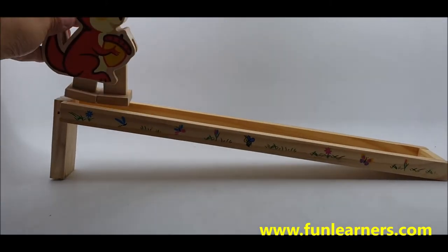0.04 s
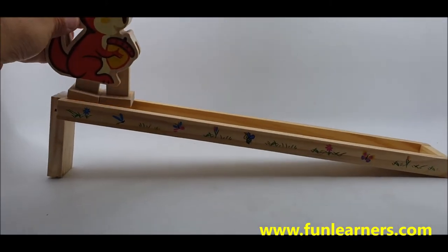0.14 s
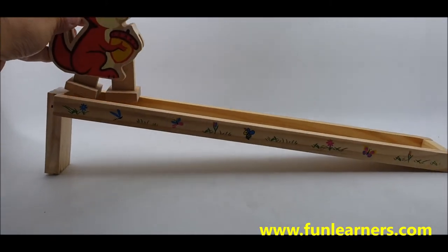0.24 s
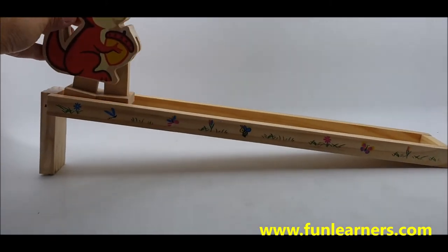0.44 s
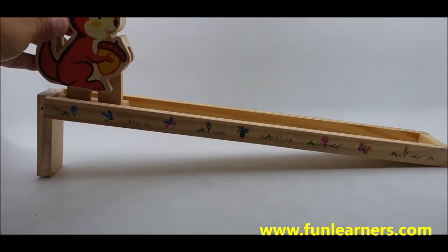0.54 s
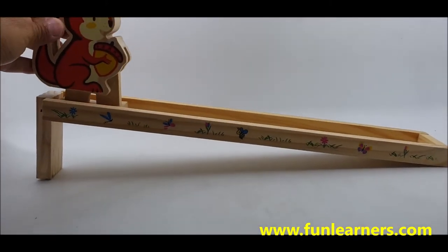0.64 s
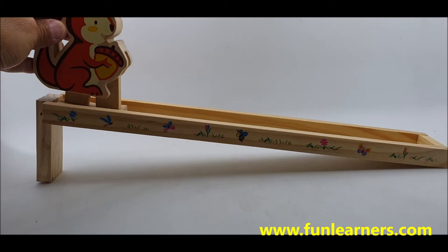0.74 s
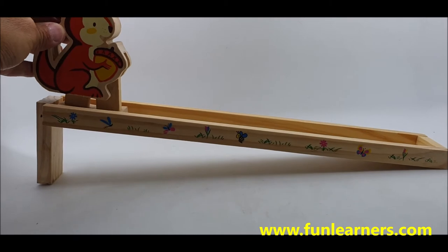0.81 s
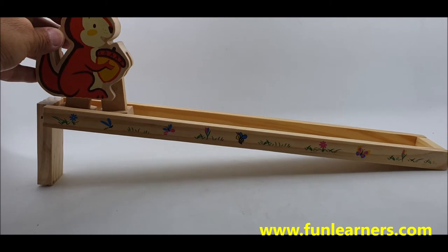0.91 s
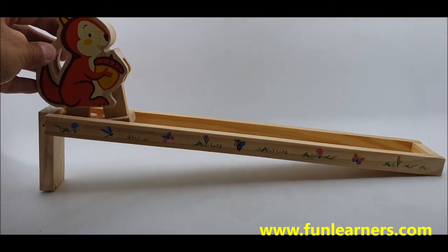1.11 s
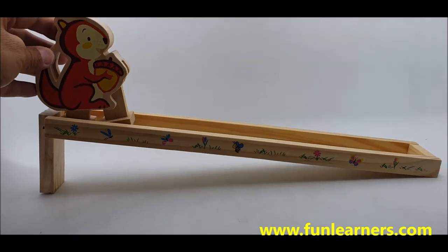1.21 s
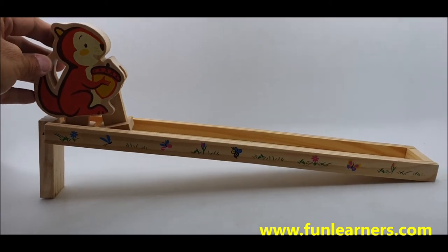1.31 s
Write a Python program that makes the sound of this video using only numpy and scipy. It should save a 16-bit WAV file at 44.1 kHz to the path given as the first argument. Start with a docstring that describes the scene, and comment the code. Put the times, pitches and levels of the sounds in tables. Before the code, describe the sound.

A wooden toy lands on a wooden ramp with a hollow thud at 0.2 seconds, just after a faint tick. Its loose leg clacks sharply twice around 0.45 and 0.55 seconds, and the rear foot knocks down right after. Soft finger rubbing and a low rumble from the ramp fade away, with a tiny dry click at 0.8 seconds. The small, quiet room has a steady low hum.

```python
"""A hollow thud, just after a faint tick: a wooden walking toy's front foot lands on a wooden ramp.
As a hand sets it at the top, the loose leg clacks twice against the body and the rear foot knocks down;
each blow rings ramp, body and leg. Around the blows are light ticks, a dry click, the rub of fingers
and the ramp's low rumble. The place is a small quiet room with mains hum and steady room tone,
heard through a stereo pair of microphones with a subdued top end."""
import sys
import numpy as np
from scipy import signal
from scipy.io import wavfile
from scipy.ndimage import uniform_filter1d, minimum_filter1d

SR = 44100
rng = np.random.default_rng(int(sys.argv[2]) if len(sys.argv) > 2 else 0)


def digitize_waveform(pressure):
    """Quantize a signal to 16-bit integers and store it at the path in sys.argv[1].

    Rows of a 2-D input are taken as channels; values are limited to [-1, 1].
    """
    field = np.atleast_2d(pressure).T
    bounded = np.clip(field, -1, 1)
    quanta = np.round(bounded * 32767).astype(np.int16)
    wavfile.write(sys.argv[1], SR, quanta)


N = 59535
T = np.arange(N) / SR

# Modes of the ramp: f/Hz, level/dB, t60/s, balance/dB (left microphone over right)
RAMP_MODES = [(100.9, 0, 0.22, 0), (174.4, 1, 0.11, 2), (243, -9, .05, -6), (414.3, -15.5, .06, 9),
              (588.3, -7, 0.061, 1), (713, -15, 0.063, -5), (1007, -11, 0.048, -10.5),
              (1397, -14.5, .05, -3.5), (2140, -14, 0.12, -9.5)]
# Modes of the toy's body: f/Hz, level/dB, t60/s, balance/dB
BODY_MODES = [(1326, -4, 0.052, 2.5), (1436, 2.5, 0.053, -3.5), (1647, -21.5, 0.12, -6),
              (2222, -11.5, 0.045, -6), (2386, -19.5, 0.019, -6), (2837, -17, 0.037, -4.5),
              (3710, -7, 0.032, -6), (4747, -12, 0.026, -12), (6190, -19, .026, -12)]
# Modes of the swinging leg: f/Hz, level/dB, t60/s, balance/dB
LEG_MODES = [(1380, -6, 0.04, 0.5), (1740, -33.5, .03, -10.5), (2272, -2, 0.013, -7),
             (3220, 2, 0.034, -3.5), (3400, -3, 0.018, -12.5), (5050, -14, 0.022, -5.5),
             (5656, -8, 0.018, -11.5), (6866, -5.5, .016, -13), (10160, 7, 0.0041, -1.5),
             (11090, -3.5, .004, -10.5)]
# The toy strikes the ramp or its own leg: t/s, ramp level/dB, body level/dB, leg level/dB,
# crack level/dB, contact low-pass f/Hz, crack high-pass f/Hz, crack treble shelf/dB
TOY_BLOWS = [(0.2135, -18, -33, -54.5, -22.5, 1200, 450, -1.5),
             (0.3977, -34.5, -51.5, -60, -47.5, 600, 204, -1.5),
             (0.4419, -49, -25.5, -12.5, -10, 7500, 800, 1),
             (0.5209, -25.5, -36, -67, -26.5, 1300, 199, -6),
             (0.5313, -55, -38.5, -24, -15.5, 7900, 2000, -8),
             (0.5338, -41.5, -6.5, -35, -7.5, 5000, 650, -7.5),
             (0.5652, -40, -34, -38.5, -18, 8000, 500, 7), (0.5666, -18, -38, -39, -9.5, 2100, 280, -19)]


def toy_blows():
    """Each blow rings ramp, body and leg in its own shares; a softer contact dulls ramp and crack."""
    out = np.zeros((2, N))
    ramp = cut(wood_ring(RAMP_MODES, build_s=0.0019), 70, "high")   # a narrow ramp radiates little bass
    body = wood_ring(BODY_MODES, build_s=0.0014)
    leg = wood_ring(LEG_MODES, build_s=0.0014)
    for s, ramp_db, body_db, leg_db, crack_db, contact_hz, bass_hz, top_db in TOY_BLOWS:
        crack = cut(contact_crack(), contact_hz, "low")
        crack = cut(crack, bass_hz, "high")
        crack = crack + (from_db(top_db) - 1) * cut(crack, 9000, "high", order=1)
        add(out, s, from_db(crack_db) * scale_attack(crack))
        add(out, s, from_db(ramp_db) * cut(ramp, contact_hz, "low"))
        add(out, s, from_db(body_db) * body + from_db(leg_db) * leg)
    return out


def wood_ring(modes, build_s):
    """Struck wood: neighbouring modes start in opposite phase and beat as they die."""
    out, size = 0, int(.3 * SR)
    for k, (hz, db, t60, balance_db) in enumerate(modes):
        # higher modes reach the two microphones out of step
        skew = (-1) ** (k // 2) * np.arccos(correlation(hz)) / 2 * np.array([[1], [-1]])
        mode = swell_and_die(build_s, t60, size) * np.sin(2 * np.pi * hz * T[:size] + skew)
        out = out + (-1) ** k * from_db(db) * pan(balance_db) * mode
    return out


# Wood's many short modes, as bands: f/Hz, relative level/dB per Hz, t60/s, balance/dB
CRACK_BANDS = [(199.4, 4, .04, 2.5), (570, -0.5, 0.05, -1.5), (1070, -4, 0.033, 2),
               (2374.5, -1, 0.043, -6.5), (4200, -3.5, 0.025, -3.5), (6800, -9.5, 0.045, -14),
               (9400, -2, .015, -1.5), (14060, -3, .014, -2)]


def contact_crack():
    """The brief dense rattle of modes where wood meets wood."""
    return scale_attack(dying_noise(CRACK_BANDS, build_s=0.00052, length_s=.06))


# Light contacts at the leg's pivot: t/s, level/dB, high-pass f/Hz
PIVOT_TICKS = [(0.1363, -40.5, 2936), (0.315, -50, 5920), (1.2425, -42, 11240)]


def pivot_ticks():
    """The pivot ticks while the toy is held: only the treble of a crack."""
    out, crack = np.zeros((2, N)), contact_crack()
    for s, db, bass_hz in PIVOT_TICKS:
        add(out, s, from_db(db) * cut(crack, bass_hz, "high"))
    return out


def dry_click(at_s=.8235):
    """One tiny click, dead centre, with a dull pop and no ring."""
    pulse = np.zeros((2, N))
    pulse[:, int(at_s * SR)] = 1
    pop = cut(pulse, 493, "low")
    return from_db(-32) * pulse + from_db(-11.5) * pop


# Colour of skin and wood rubbing on wood: f/Hz, relative level/dB per Hz, balance/dB
RUB_SPECTRUM = [(147, 22.5, -2), (402, 22, -2), (1080, 10, 5), (1930, 8.5, -9), (3970, -0.5, -8),
                (6800, -0.5, -14), (9500, 3, -2), (14970, 0.5, -7.5)]
# Strength of the rubbing: t/s, gain/dB
RUB_ENVELOPE = [(0, -64), (.2, -61.5), (.235, -54), (.27, -47), (.32, -56.5), (.37, -63.5), (.41, -57.5),
                (.5, -54.5), (.7, -66), (.87, -75), (.98, -67), (1.12, -84.5), (1.27, -76.5), (1.35, -78.5)]


def handling_rub():
    """Fingers and the toy's feet rub on the wood: a soft noise that follows the handling."""
    return envelope(RUB_ENVELOPE) * steady_noise(RUB_SPECTRUM)


# Lowest resonances of the hollow ramp: f/Hz, width/Hz, relative level/dB
RUMBLE_RESONANCES = [(100.8, 22, -1.5), (179, 39, -9)]
# How hard the hand shakes the ramp: t/s, gain/dB
RUMBLE_ENVELOPE = [(0, -45), (.18, -45.5), (.33, -35), (.45, -36.5), (.62, -37.5), (.8, -43.5), (.92, -67),
                   (1.04, -42.5), (1.15, -50), (1.35, -65.5)]


def ramp_rumble():
    """The hand stirs the hollow ramp into a low rumble."""
    rumble = sum(from_db(db) * resonant_noise(hz, width) for hz, width, db in RUMBLE_RESONANCES)
    return envelope(RUMBLE_ENVELOPE) * rumble


# Resonances of a foot sliding on the ramp: f/Hz, width/Hz, relative level/dB
SLIDE_RESONANCES = [(3560, 390, -1), (3900, 340, -5.5), (4960, 340, -0.5), (5700, 300, -7),
                    (7030, 840, 6.5)]


def foot_slide(middle_s=0.98, half_width_s=0.09):
    """A foot slips a little and stirs a few woody resonances, mostly in the right microphone."""
    hiss = 0
    for hz, width, db in SLIDE_RESONANCES:
        hiss = hiss + from_db(db) * np.array([resonant_noise(hz, width), resonant_noise(hz, width)])
    swell = np.exp(-((T - middle_s) / half_width_s) ** 2)
    return from_db(-80.5) * swell * pan(-11.5) * hiss


# The small room's reverberation: f/Hz, level/dB per Hz, t60/s, balance/dB
REVERB_BANDS = [(90, -13, 0.13, -0.5), (196, -2.5, 0.23, 0), (520, -9.5, 0.097, 2), (1400, -12, 0.31, -5.5),
                (3000, -10.5, .3, 1.5), (6026, -12.5, 0.15, 0.5), (9800, -11, .3, 0.5),
                (15000, -10, .28, -2.5)]


def room_reverb(direct, first_echo_s=0.011):
    """The diffuse tail starts with the first wall echo, whose path is about 4 m longer than direct."""
    out = np.zeros((2, N))
    tail = dying_noise(REVERB_BANDS, build_s=0.0017, length_s=.6)
    add(out, first_echo_s, signal.fftconvolve(direct, tail, axes=1))
    return out


# Partials of the mains hum: f/Hz, rms level/dB, share of the amplitude that wavers
HUM_PARTIALS = [(48.3, -40, .04), (95.8, -51.5, 0.098), (146, -57.5, 0.75), (193.6, -59.5, 0.2),
                (332.6, -69, 0.62), (966, -76, 0.68)]


def mains_hum():
    """A low hum, alike in both microphones; each partial wavers slowly in level."""
    out = 0
    for hz, db, share in HUM_PARTIALS:
        waver = np.interp(T, np.linspace(0, T[-1], num=12), rng.standard_normal(size=12))
        tone = np.sqrt(2) * np.sin(2 * np.pi * (hz * T + rng.random()))
        out = out + from_db(db) * (1 + share * waver) * tone
    return out


# The quiet room at the microphones: f/Hz, level/dB per Hz, balance/dB
ROOM_TONE_SPECTRUM = [(25, -50.5, 7), (60, -31, 13), (110, -29.5, 5), (180, -36.5, 6.5), (280, -42, 4.5),
                      (493.4, -53, -0.5), (900, -56, -7), (1300, -52, -5), (2000, -70, -11),
                      (3450, -82.5, 3.5), (7000, -72, -5.5), (9550, -73.5, -2), (15160, -66, 3)]


def room_tone():
    """The room's steady noise, mostly bass and leaning left."""
    return steady_noise(ROOM_TONE_SPECTRUM)


# Likeness of the two microphones' signals: f/Hz, left-right correlation
PAIR_CORRELATION = [(60, .99), (140, 1), (300, 0.9), (1300, 0.43), (2500, 0), (8000, 0)]


def correlation(hz):
    """The pair hears the bass alike and the treble unrelated."""
    return at_hz(PAIR_CORRELATION, hz)[0]


def noise_bands(size=N):
    """Half-octave bands of noise as the pair hears them: yields (centre f/Hz, stereo band)."""
    edges = 16000 / 2 ** np.arange(9.5, -.1, -.5)
    white = rng.standard_normal((2, 2, size + SR // 10))
    for k, (low, high) in enumerate(zip(edges, edges[1:])):
        band_pass = signal.butter(2, [low, high], "band", fs=SR, output="sos")
        mid, side = signal.sosfilt(band_pass, white[k % 2])[:, -size:]
        hz = np.sqrt(low * high)
        alike = correlation(hz)
        yield hz, np.sqrt((1 + alike) / 2) * mid + np.sqrt((1 - alike) / 2) * side * [[1], [-1]]


def steady_noise(spectrum):
    """Noise with a given colour and balance."""
    out = 0
    for hz, band in noise_bands():
        db, balance_db = at_hz(spectrum, hz)
        out = out + from_db(db) * pan(balance_db) * band
    return out


def dying_noise(bands, build_s, length_s):
    """Countless modes, each band with its own decay; at 0 dB a band passes energy unchanged."""
    out, size = 0, int(length_s * SR)
    for hz, band in noise_bands(size):
        db, t60, balance_db = at_hz(bands, hz)
        burst = band * swell_and_die(build_s, t60, size)
        spectrum_share = hz / np.sqrt(2) / SR
        energy = np.sum(burst ** 2, axis=1, keepdims=True)
        out = out + from_db(db) * pan(balance_db) * burst * np.sqrt(spectrum_share / energy)
    return out


def resonant_noise(hz, width_hz):
    """Noise through one resonance applied twice; rms 1."""
    b, a = signal.iirpeak(hz, hz / width_hz, fs=SR)
    white = rng.standard_normal(N + SR // 4)
    narrow = signal.lfilter(b, a, signal.lfilter(b, a, white))[-N:]
    return narrow / np.std(narrow)


def swell_and_die(build_s, t60, size):
    """A quick build-up and an exponential decay."""
    return (1 - np.exp(-T[:size] / build_s)) * np.exp(-np.log(1000) * T[:size] / t60)


def scale_attack(burst):
    """Scale a burst by the rms of its first 5 ms so that it peaks near 1."""
    return burst / np.sqrt(np.mean(burst[:, :SR // 200] ** 2)) / np.pi


def from_db(db):
    """Decibels to gain."""
    return 10 ** (np.asarray(db) / 20)


def envelope(points):
    """A gain curve through (t/s, gain/dB) points."""
    return from_db(np.interp(T, *np.transpose(points)))


def pan(db):
    """Left and right gains for a level difference."""
    return from_db(np.array([[db], [-db]]) / 2)


def at_hz(table, hz):
    """A table's columns at one frequency."""
    table_hz, *columns = np.transpose(table)
    return [np.interp(np.log(hz), np.log(table_hz), column) for column in columns]


def cut(x, hz, kind, order=2):
    """Butterworth low- or high-pass."""
    return signal.sosfilt(signal.butter(order, hz, kind, fs=SR, output="sos"), x + 1e-18)


def add(out, s, sound):
    """Mix a sound in from time s."""
    start = int(s * SR)
    out[:, start:start + sound.shape[-1]] += sound[..., :N - start]


def scene():
    """The toy and its room echo, then the handling, over hum and room tone."""
    wood = toy_blows() + pivot_ticks()
    toy = wood + room_reverb(wood) + dry_click()
    handling = handling_rub() + foot_slide() + ramp_rumble()
    return toy + handling + mains_hum() + room_tone()


def record(dry):
    """The microphones' treble steps down, a quick limiter holds the highest peaks and the top is cut."""
    shelf_hz, shelf_db, ceiling, top_hz = 7040, -10, .9, 15700
    treble = cut(dry, shelf_hz, "high", order=17)
    heard = cut(dry, shelf_hz, "low", order=17) + from_db(shelf_db) * treble
    gain = ceiling / np.maximum(np.abs(heard), ceiling)
    gain = uniform_filter1d(minimum_filter1d(gain, size=89), size=89)   # held and smoothed over 2 ms
    top_cut = signal.ellip(10, .1, 90, top_hz, fs=SR, output="sos")
    return signal.sosfilt(top_cut, gain * heard)


dry = scene()
out = record(dry)
digitize_waveform(out)
```